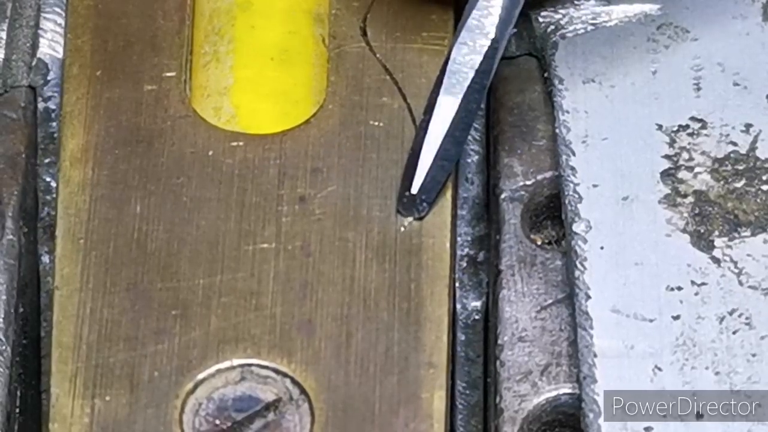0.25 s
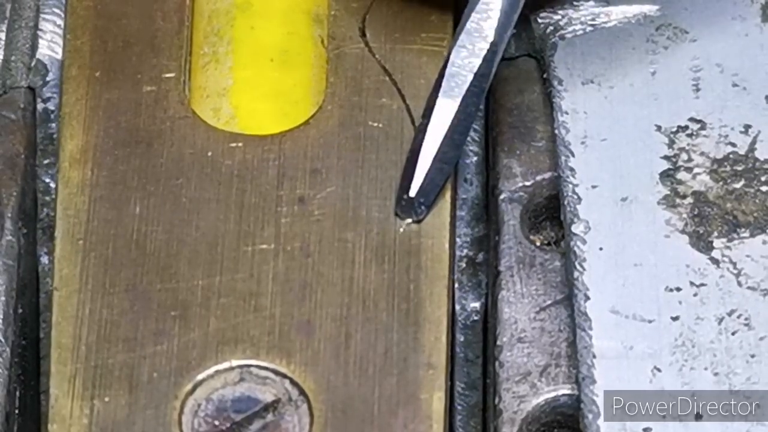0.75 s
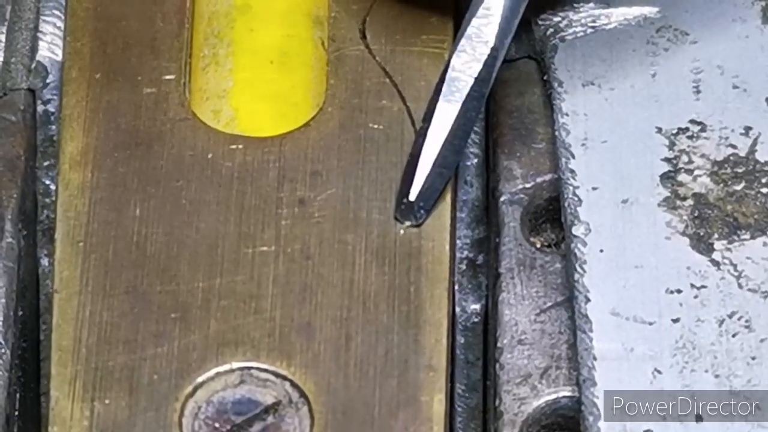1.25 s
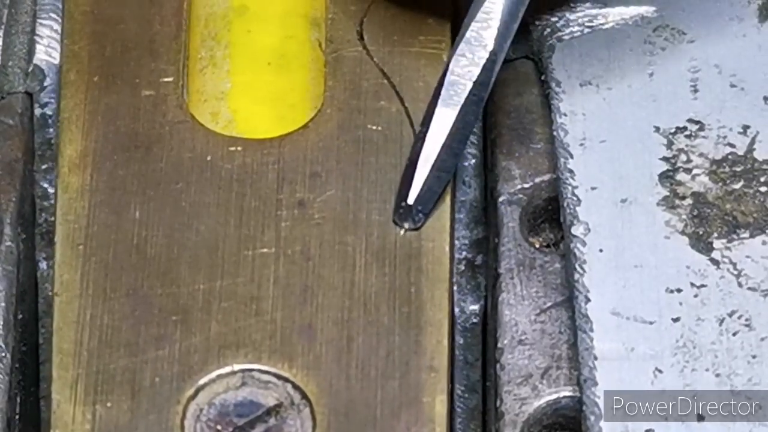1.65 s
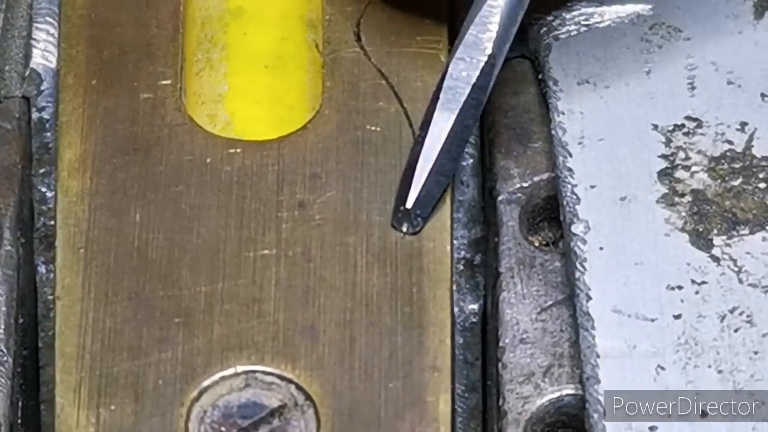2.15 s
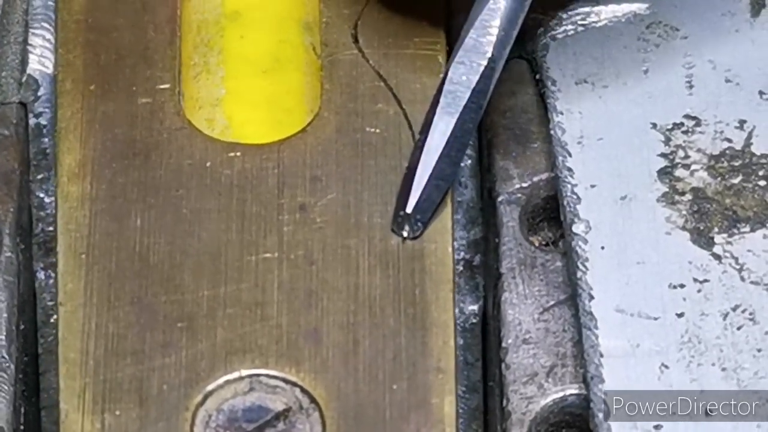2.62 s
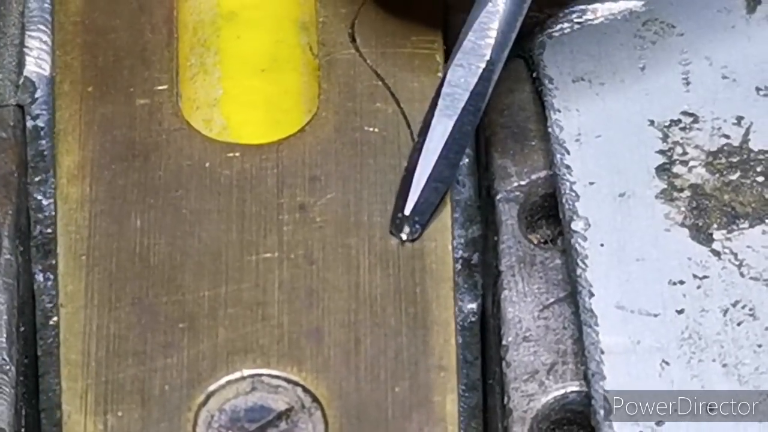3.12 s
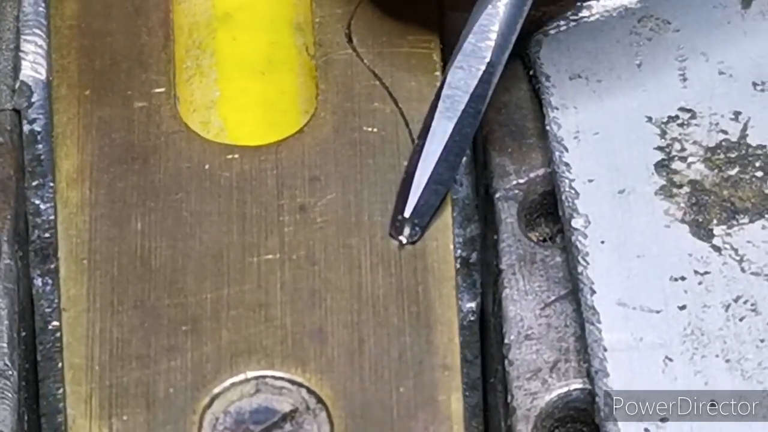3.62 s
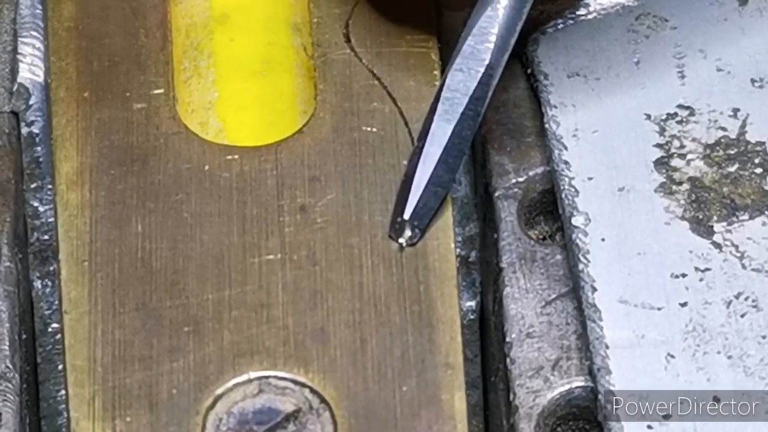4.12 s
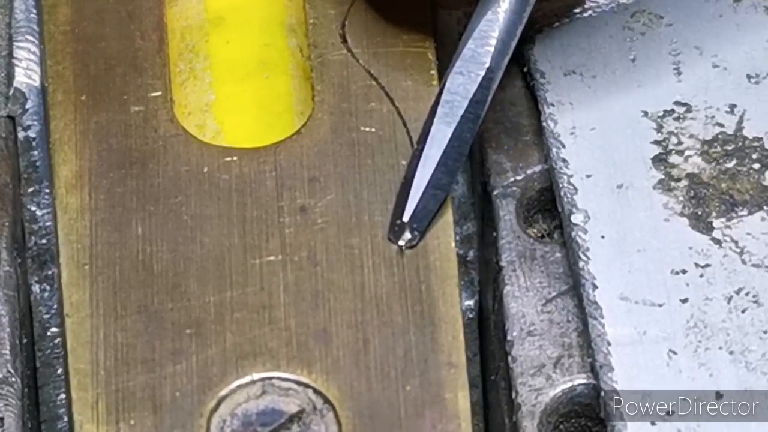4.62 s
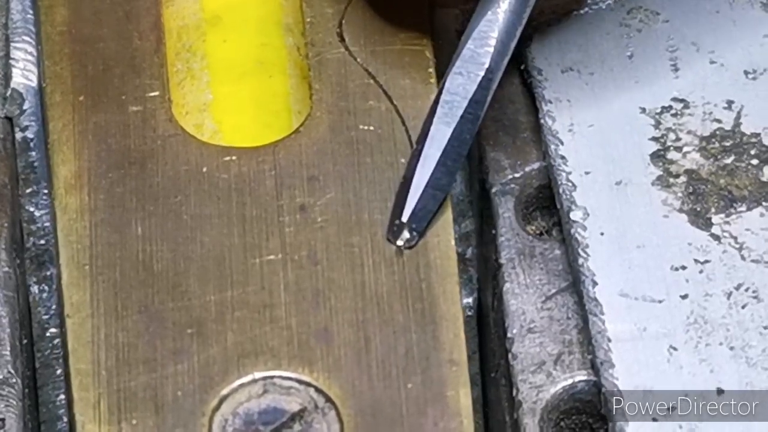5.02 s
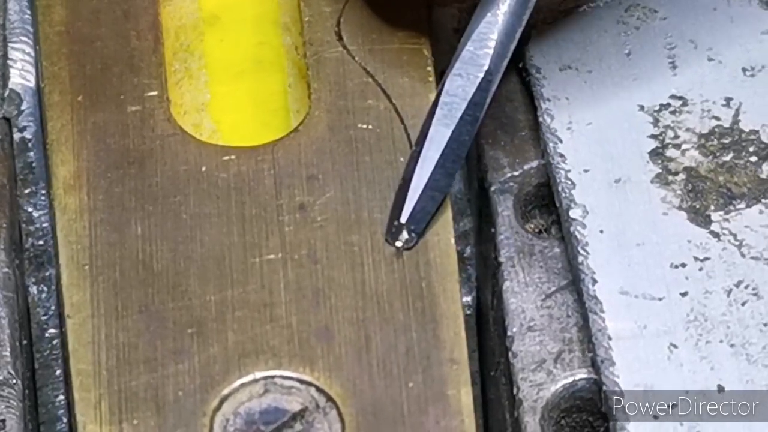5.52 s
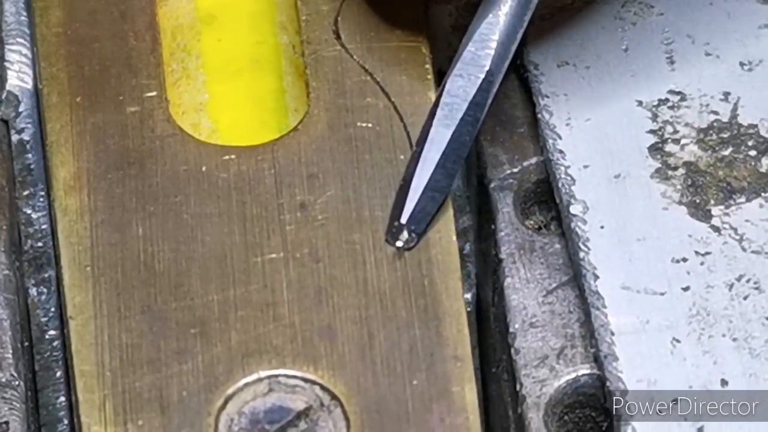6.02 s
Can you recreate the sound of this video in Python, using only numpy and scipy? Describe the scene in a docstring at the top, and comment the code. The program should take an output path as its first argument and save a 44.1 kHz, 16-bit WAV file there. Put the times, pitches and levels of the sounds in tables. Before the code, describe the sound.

For the first 0.2 seconds only a nearby pump is heard: a low throbbing hum with knocks and faint broad running noise, leaning slightly left. At about 0.22 s an engraving handpiece starts, its piston hammering a steel graver against brass about 25 times a second, in a dry, rapid, buzzing rattle. The first blows are thinner until the tip seats near 0.35 s. Each blow is a bright crack with a very short metallic ring from graver, plate and vice, followed by a hissing puff of air. From 0.7 to 1.4 s it is somewhat quieter, often to the right, then stronger around 1.7 s and softer near 2.5 s. From about 3 s the cut deepens, louder and harder, drifting centre to left, continuing to 6.27 s. Faint dull bench bumps fall near 0.5, 0.9, 2.1 and 5.6 s. Close stereo pickup, short small-room echoes, little extreme treble.

```python
"""A pump hums and knocks nearby; after about 0.22 s an engraving handpiece starts up, 25 blows a second.
Its piston hammers a steel graver along a brass plate held in a vice: each blow cracks a chip loose and
rings graver, plate and vice as decaying sines, with echoes from a small room. Shaped noise makes the air
that puffs out on the return stroke; now and then a hand bumps the bench with a dull, low ring."""
import sys
import numpy as np
from scipy import signal
from scipy.fft import rfft, irfft, next_fast_len
from scipy.io import wavfile
from scipy.ndimage import uniform_filter1d

SR = 44100
rng = np.random.default_rng(int(sys.argv[2]) if len(sys.argv) > 2 else 0)


def wav_out(sig):
    """Save sig, one row per channel (or a flat mono array), as 16-bit PCM at SR to the path in sys.argv[1]."""
    wavfile.write(sys.argv[1], SR, np.round(np.clip(np.atleast_2d(sig).T, -1, 1) * 32767).astype(np.int16))


def volts_from_db(level):
    """Convert decibel levels to linear amplitude ratios."""
    exponent = np.asarray(level, float) / 20
    return 10 ** exponent


N = 276507   # length [samples]

# The pump over time: (time [s], stroke hum [dB], overtones, knock and running noise [dB], left-right [dB])
PUMP_COURSE = [(0.0, -51, -61, 4.5), (0.23, -50.5, -57, 2.5), (0.488, -56, -58.5, -0.5),
               (0.71, -55, -61, -0.5), (1.38, -56, -61, -1.5), (1.55, -53, -61.5, -4), (1.83, -62, -60, -2),
               (2.09, -58, -60, -2), (2.43, -62, -63, -2.5), (3.28, -59.5, -62.5, 1), (3.56, -58, -62, 0),
               (4.24, -59, -60.5, 1.5), (4.66, -62, -62.5, 3.5), (5.17, -62, -62, 1.5),
               (5.55, -62, -61.5, 3), (6.27, -62, -61.5, 2.0)]
# Pump overtones: (multiple of the stroke rate, relative level [dB])
PUMP_OVERTONES = [(2, -15), (3, -21.5), (4, -18), (5, -14.5), (6, -17.5), (7, -14.5), (8, -9), (9, -29),
                  (11, -20), (12, -13.5), (15, -11), (16, -13.5), (17, -4), (18, -11), (20, -13.5),
                  (24, -30), (29, -18.5)]
# Resonances of the pump case: (frequency [Hz], relative level [dB], t60 [s])
PUMP_CASE_MODES = [(614, -14, 0.14), (743, -28, 0.25), (974, -8.5, 0.094), (1221, -4, 0.16),
                   (1472, -2.5, 0.052), (1880, -3.5, 0.014)]
# Colour of the broad running noise: (frequency [Hz], relative density [dB per Hz])
RUNNING_NOISE = [(60, -21), (120, -18.5), (200, -19.5), (300, -25), (425, -17.5), (668, -32), (735, -24.5),
                 (1300, -27), (2000, -30), (5080, -41.5), (7630, -34.5), (12000, -58)]
# Bumps on the bench: (time [s], relative level [dB], frequency [Hz])
BENCH_BUMPS = [(0.469, -53, 56.4), (0.56, -58, 57), (0.933, -48.5, 58.4), (1.492, -59, 56.5),
               (2.12, -57, 188), (2.179, -58, 87), (3.869, -64, 107), (4.501, -60, 130), (5.545, -50, 56.5),
               (5.589, -53, 156), (5.629, -52, 61.9)]
# How long the room's echoes last: (frequency [Hz], t60 [s])
ECHO_T60 = [(800, 0.5), (3000, 0.19), (8000, 0.13), (15000, 0.024)]
# How alike the echoes are on both sides: (frequency [Hz], left-right likeness [0-1])
ECHO_LIKENESS = [(800, 0.79), (2000, 1), (5000, 0.046), (12000, 0.054)]
# Colour of the exhaust air: (frequency [Hz], relative density [dB per Hz])
AIR_COLOUR = [(2000, -22.5), (4000, 0.5), (6500, -3), (8000, 5.5), (9000, -1), (11000, -20), (14500, -14),
              (16500, -30)]
# The hand guiding the graver, bite running from 0 shallow to 1 deep and a little beyond:
# (time [s], blow level [dB], bite, left-right balance of the blows [dB], how early the blow lands [ms])
HAND_COURSE = [(0.219, -29.5, -0.33, 3.5, 0.5), (0.321, -26.5, 0.37, 1, 1.5), (0.379, -25, -0.29, -1, 6),
               (0.437, -27.5, -0.45, -6, 6.5), (0.573, -26.5, -0.018, -5, 6), (0.632, -30, 0.13, -2, 4.5),
               (0.767, -30.5, 0.13, -0.5, 3.5), (0.893, -30, 0.5, -1.8, 6.5),
               (1.061, -28.5, 0.044, -2.5, 4), (1.179, -28.5, 0.14, -5.5, 9), (1.259, -32.5, 0.093, -1, 7),
               (1.352, -31, 0.29, -0.5, 4), (1.461, -27.5, 0.29, -5.5, 6.5), (1.58, -28, 0.37, -6, 5.5),
               (1.651, -25.5, 0.13, -6, 6), (1.771, -26, -0.073, -6, 8.5), (1.85, -28.5, 0.083, -3.5, 7.5),
               (2.199, -27.5, 0.38, -3.5, 8), (2.56, -29.5, 0.57, -3.5, 5.5), (2.97, -24, 0.86, -1, 7),
               (3.2, -25, 0.77, 0.8, 7.5), (3.65, -23, 1.05, -0.5, 8.5), (3.798, -21.5, 1.06, -0.5, 7.5),
               (3.99, -20.5, 0.96, 1, 7.5), (4.08, -22.5, 1.1, -1, 8), (4.3, -22.5, 1, 2, 8.5),
               (4.63, -23, 1.12, 3, 6), (4.901, -23.5, 0.93, 1.5, 6), (5.272, -22, 1.3, 3, 5),
               (5.4, -23, 1.05, -0.3, 2), (5.65, -23, 1.1, 4, 3.5), (5.87, -22, 1.2, 0.9, 1.67),
               (6.27, -21, 1.1, 0, 0.06)]
# Spread from blow to blow: (level [dB], bite, left-right [dB], timing [ms])
BLOW_SPREAD = [.7, .1, .6, .5]
# The vice ringing on: (frequency [Hz], relative level [dB], t60 [s])
VICE_RING = [(1001.6, -17.5, 0.21), (1127, -12, 0.074), (1270, -25, 0.051), (1670, -30, 0.039),
             (1955, -8, 0.13), (2302, -9, 0.096), (2640, -16, 0.047), (2796, -5.5, 0.045), (3063, -15, .06),
             (3520, -8.5, 0.066), (4145, -14, 0.067), (4430, -21, 0.056), (5560, -8, .05),
             (6220, -4.5, 0.049), (7620, -23, 0.03), (10000, -17, 0.036)]
# Dense short modes of the crack, shallow and deep cut: (frequency [Hz], relative density [dB per Hz])
SHALLOW_CRACK = [(600, -39), (1000, -30), (3000, -14.5), (6000, -5.5), (7600, -2), (9300, -9.5),
                 (10800, -22.5), (12000, -15.5), (14500, -16), (16000, -16)]
DEEP_CRACK = [(600, -69), (1000, -28), (3000, -14), (5500, -2.5), (7500, -11), (9500, -14), (11400, -26.5),
              (12500, -14.5), (13600, -33), (14500, -8.5), (16000, -39)]
# How alike the crack is on both sides: (frequency [Hz], left-right likeness [0-1])
CRACK_ALIKE = [(60, 0.96), (380, 0.69), (2380, 1), (15000, 0.044)]
# Graver, plate and vice, levels relative to one another: (frequency [Hz], t60 [s],
# level in a shallow cut [dB], level in a deep cut [dB], left-right [dB], lead of the left side [radians])
STRUCK_MODES = [(834.6, 0.019, -56, -41, 4.5, -0.2), (979, 0.033, -41.5, -35, 1.5, -0.18),
                (1130, 0.09, -66, -54, 6, 2.1), (1266, 0.043, -56, -44, 4, 0.6),
                (1738, 0.012, -35, -32.5, -0.5, 1.3), (1794, 0.023, -38.5, -50, 5.5, 0.8),
                (1926, 0.012, -35.5, -29, -1.5, 0.12), (2268, 0.045, -43, -35, -13.5, 1.56),
                (2384, 0.037, -35, -34, 2, 0.53), (2556, 0.0082, -26.5, -28, 4, 0.55),
                (2870, 0.046, -34.5, -29, 4, -0.2), (2992, 0.024, -39.5, -27.5, 8, -1.2),
                (3473, 0.026, -38, -25.5, 1, -0.3), (3750, 0.045, -42, -37, 16.5, 2.8),
                (3880, 0.019, -32, -27, 7, -1.75), (4234, 0.045, -40.5, -35.5, -8.5, -1.6),
                (4373, 0.056, -41.5, -38.5, 6, 0.2), (4870, 0.016, -31, -19.5, -1, -1.2),
                (5052, 0.025, -36, -27, 0, 0.1), (5277, 0.037, -44, -37.5, 13, 0.1),
                (5290, 0.024, -36.5, -35, 15.5, 3), (5646, 0.029, -31, -23.5, -0.5, 0.1),
                (5846, 0.016, -35, -35.5, 13, 3.5), (6575, 0.0095, -28.5, -23.5, 8, 0.93),
                (7044, 0.013, -33, -43, 5, 2.5), (7210, 0.025, -30.5, -28, 11, 4.5),
                (7420, 0.027, -28.5, -29, -9.5, 4.2), (7650, 0.02, -42, -27.5, -3.5, 2.4),
                (7810, 0.025, -29.5, -34.5, 15, 1.5), (8420, 0.02, -32, -31.5, -14, -1.4),
                (8720, 0.014, -35.5, -33, -14, 2)]
# The grip damps the shank's ring: (time [s], change in level [dB])
SHANK_DAMPING = [(.2, 8.5), (.5, 0), (1.08, 4), (1.15, -4.5), (2.5, -2.5), (6.27, -0.5)]
# The piston bounces on the graver: (time after the blow [s], level against the blow [dB])
PISTON_BOUNCES = [(.0047, -19), (.0074, -24)]

FIRST_BLOW_S, STROKE_S, IDLE_STROKE_S = .2196, .039788, .0396   # the idle stroke runs before the first blow
RETURN_SHALLOW_S, RETURN_DEEP_S = 0.016, 0.017   # the piston ticks at the end of its return stroke
SEATED_S = 0.352   # time at which the tip has seated
UNSEATED_HZ, UNSEATED_DB = 5060, -19.5   # until then, modes under this pitch lose dB per octave
UNSEATED_CRACK_DB = -11   # and little chip breaks yet
BENCH_HZ, BENCH_DB, BENCH_T60_S = 163.6, -7, 0.28   # bench top, its level against the bump
SHANK_HZ = 5630


def rms_one(x):
    """Scale to rms 1."""
    return x / np.sqrt(np.mean(x ** 2) + 1e-20)


def at_hz(points, hz):
    """Read a table on a log-frequency axis."""
    table_hz, values = np.transpose(points)
    return np.interp(np.log(np.maximum(hz, 1)), np.log(table_hz), values)


def sides(pan_db):
    """Left and right gains; positive leans left."""
    return volts_from_db(np.array([pan_db / 2, -pan_db / 2]))


def coloured(spectrum, size, likeness):
    """Stereo noise with a given spectrum and left-right likeness, at rms 1."""
    hz = np.arange(size // 2 + 1) * SR / size
    mid, side = rfft(rng.standard_normal((2, size))) * volts_from_db(at_hz(spectrum, hz))
    alike = np.clip(at_hz(likeness, hz), 0, 1)
    stereo = np.sqrt(1 + alike) * mid + np.sqrt(1 - alike) * side * [[1], [-1]]
    return rms_one(irfft(stereo, size))


def clicks(seconds, sizes):
    """One click for each time; sizes may be a row per channel."""
    out = np.zeros(np.shape(sizes)[:-1] + (N,))
    out[..., np.round(np.asarray(seconds) * SR).astype(int)] = sizes
    return out


def ring(x, hz, t60):
    """A unit click sets a decaying arrow of length 1 turning; its shadow is the sine."""
    turn = volts_from_db(-60 / (t60 * SR)) * np.exp(2j * np.pi * hz / SR)
    return signal.lfilter([1], [1, -turn], x + 1e-18)


def related(rows, likeness):
    """Blend into each row a share of the one before it; the spread stays the same."""
    alike = np.clip(likeness, 0, .98)
    fresh = np.sqrt(1 - alike ** 2)
    return signal.lfilter([fresh], [1, -alike], rows, axis=0, zi=alike * rows[-1:])[0]


def looseness(s):
    """How loosely the tip sits: 1 at the first blow, 0 once seated."""
    return np.clip((SEATED_S - s) / (SEATED_S - s[0]), 0, 1)


def strokes(s):
    """Pump cycles counted so that every blow falls on a whole number."""
    t = np.arange(N) / SR
    idle = (t - s[0]) / IDLE_STROKE_S
    return np.where(t < s[0], idle, np.interp(t, s, np.arange(len(s))))


def pump(cycles, overtone_db, knock_db, floor_db, knock_lead):
    """A hum on the stroke rate and its multiples, a knock in the case every turn, and broad running noise."""
    s, *columns = np.transpose(PUMP_COURSE)
    hum_db, body_db, pan_db = [np.interp(np.arange(N) / SR, s, c) for c in columns]
    # the crank turns more evenly than the blows fall
    flywheel = uniform_filter1d(np.gradient(cycles), size=32768)
    flywheel = uniform_filter1d(flywheel, size=16384)
    turn = 2 * np.pi * (cycles[0] + np.cumsum(flywheel))
    hum = np.sqrt(2) * volts_from_db(hum_db) * np.cos(turn - 2.8)
    starts = rng.uniform(0, 2 * np.pi, len(PUMP_OVERTONES))   # each multiple starts at its own angle
    overtones = sum(volts_from_db(db) * np.sin(k * turn + a) for (k, db), a in zip(PUMP_OVERTONES, starts))
    knocks = np.diff(np.floor(cycles + knock_lead), prepend=0) == 1
    knock = 0
    for hz, db, t60 in PUMP_CASE_MODES:
        struck = knocks * volts_from_db(rng.normal(0, 1.3, N))
        knock = knock + volts_from_db(db) * ring(struck, hz, t60).imag
    floor = coloured(RUNNING_NOISE, next_fast_len(N), [(60, 0.82), (600, 0.97), (8000, 0.13)])[:, :N]
    body = volts_from_db(overtone_db) * rms_one(overtones) + volts_from_db(knock_db) * knock + volts_from_db(floor_db) * floor
    return (hum + volts_from_db(body_db) * body) * sides(pan_db)


def bumps(cycles, level_db):
    """Dull thuds: a low push that rings a few cycles and sets the bench top going."""
    soft = signal.butter(2, 400, fs=SR, output="sos")
    push = 0
    for s, db, hz in BENCH_BUMPS:
        push = push + ring(clicks([s], [volts_from_db(db + level_db)]), hz, cycles / hz).imag
    s, db, _ = np.transpose(BENCH_BUMPS)
    top = ring(clicks(s, volts_from_db(db + level_db + BENCH_DB)), BENCH_HZ, BENCH_T60_S).imag
    return signal.sosfilt(soft, push + top)


def room(x, blows, first_s, count):
    """Dense echoes, each band dying at its own rate."""
    t = np.arange(12288) / SR
    edges = 500 * 2.0 ** np.arange(6)   # octave bands [Hz]
    # several random echo patterns slowly crossfade, so no single one colours the whole
    place = np.linspace(0, count - 1, N)
    mono = np.mean(x, axis=0, keepdims=True)
    out = 0
    for k in range(count):
        noise = coloured([(500, 0), (16000, 0)], len(t), ECHO_LIKENESS)
        echo = 0
        for low, high in zip(edges, edges[1:]):
            octave = signal.butter(2, [low, high], "band", fs=SR, output="sos")
            decay = volts_from_db(-60 * t / at_hz(ECHO_T60, np.sqrt(low * high)))
            echo = echo + signal.sosfilt(octave, noise) * decay
        echo = echo * (1 - np.exp(-(t / first_s) ** 2))
        echo = echo / np.sqrt(np.sum(echo ** 2) / 2)
        heard = mono * np.sqrt(np.clip(1 - np.abs(place - k), 0, 1))
        out = out + signal.oaconvolve(heard, echo, axes=1)[:, :N]
    return out * sides(np.interp(np.arange(N) / SR, *blows[[0, 3]]))


def puff(blows, level_db, follows, centre, width, leak_db, tick_db, tick_t60, grain_db):
    """Air sputters out of the handpiece, most on the return stroke, and spits as the piston ticks back."""
    s, db, bite, pan_db = blows
    t = np.arange(N) / SR
    back = s + np.interp(bite, [0, 1], [RETURN_SHALLOW_S, RETURN_DEEP_S])
    back = np.minimum(back, (N - 1) / SR)
    # at 0 Hz the ring is a bare decay: the spit's envelope
    tick = np.abs(ring(clicks(back, volts_from_db(tick_db + rng.normal(0, 6.0, len(s)))), 0, tick_t60))
    exhaust = np.exp(-((strokes(s) % 1 - centre) / width) ** 2)
    gate = volts_from_db(leak_db) + exhaust + tick
    sputter = volts_from_db(grain_db * rms_one(uniform_filter1d(rng.standard_normal(N), size=48)))
    start = np.clip((t - s[0]) / 0.0073, 0, 1)   # silent before the first blow
    effort = volts_from_db(follows * np.interp(t, s, db) + level_db) * start
    hiss = coloured(AIR_COLOUR, next_fast_len(N), [(2000, 0.39), (15000, 0.059)])[:, :N]
    return hiss * gate * sputter * effort * sides(np.interp(t, s, pan_db))


def piston():
    """One blow per pump stroke, as the hand sets it, with a little chance: rows s, dB, bite, left-right dB."""
    due = np.arange(FIRST_BLOW_S, N / SR, STROKE_S)
    s, *columns = np.transpose(HAND_COURSE)
    chance = rng.standard_normal((len(due), len(columns))) * BLOW_SPREAD
    guided = np.array([np.interp(due, s, c) for c in columns])
    db, bite, pan_db, early_ms = guided + chance.T
    return np.array([np.minimum(due - early_ms / 1000, (N - 1) / SR), db, bite, pan_db])


def vice(blows, level_db, deep_db, scatter_db, spread, rise_t60):
    """The vice takes each blow softly and rings on, more in a deep cut; its modes reach each side differently."""
    s, db, bite, pan_db = blows
    seated = np.clip((s - s[0]) / (SEATED_S - s[0]), .1, 1)
    chance = rng.standard_normal((len(s), len(VICE_RING)))
    leads = rng.standard_normal(len(VICE_RING))
    out = np.zeros((2, N))
    for k, (hz, mode_db, t60) in enumerate(VICE_RING):
        blow_db = db + level_db + deep_db * bite + mode_db + scatter_db * chance[:, k]
        struck = clicks(s, seated * volts_from_db(blow_db) * sides(pan_db))
        arrow = ring(struck, hz, t60) - ring(struck, hz, rise_t60)   # soft onset
        turn = np.exp(.5j * spread * leads[k] * np.array([[1], [-1]]))
        out += (arrow * turn).imag
    return out


def crack(blows, level_db, t60, rise_s, scatter_db, likeness):
    """A dense burst as the chip breaks; its grain is mostly fresh at each blow."""
    s, db, bite, pan_db = blows
    deep = np.clip(bite, 0, 1)
    t = np.arange(2048) / SR
    shape = volts_from_db(-60 * t / t60) * (1 - np.exp(-t / rise_s))
    chance_db = scatter_db * rng.standard_normal(len(s))
    size = volts_from_db(db + level_db + UNSEATED_CRACK_DB * looseness(s) + chance_db) * sides(pan_db)
    bursts = 0
    for spectrum, share in ((SHALLOW_CRACK, np.sqrt(1 - deep)), (DEEP_CRACK, np.sqrt(deep))):
        noise = np.array([coloured(spectrum, len(t), CRACK_ALIKE) for _ in s])
        bursts = bursts + related(noise, likeness) * share[:, None, None]
    out = np.zeros((2, N + len(t)))
    for start, gains, burst in zip(np.round(s * SR).astype(int), size.T, bursts):
        out[:, start:start + len(t)] += gains[:, None] * burst * shape
    return out[:, :N]


def ringing(blows, level_db, scatter_db, rise_t60):
    """Each blow strikes every mode; a deeper bite shifts the strength from tip to plate."""
    s, db, bite, pan_db = blows
    hz, t60, shallow_db, deep_db, mode_pan_db, lead = np.transpose(STRUCK_MODES)
    octaves_under = np.maximum(np.log2(UNSEATED_HZ / hz), 0)
    unseated_db = UNSEATED_DB * np.outer(looseness(s), octaves_under)
    share = volts_from_db(shallow_db + np.outer(bite, deep_db - shallow_db) + unseated_db)
    shank = np.argmin(np.abs(hz - SHANK_HZ))
    share[:, shank] *= volts_from_db(np.interp(s, *np.transpose(SHANK_DAMPING)))
    share = share / np.sqrt(np.sum(share ** 2, axis=1, keepdims=True))
    chance_db = scatter_db * related(rng.standard_normal(share.shape), 0.3)
    size = share * volts_from_db(db[:, None] + level_db + chance_db)
    out = np.zeros((2, N))
    for k in range(len(hz)):
        struck = clicks(s, size[:, k] * sides(pan_db))
        arrow = ring(struck, hz[k], t60[k]) - ring(struck, hz[k], rise_t60)   # the ring swells in briefly
        turn = np.exp(.5j * lead[k] * np.array([[1], [-1]]))
        # neighbours swing opposite ways
        out += (-1) ** k * sides(mode_pan_db[k])[:, None] * (arrow * turn).imag
    after_s, bounce_db = np.transpose(PISTON_BOUNCES)
    bounce = clicks([0, *after_s], volts_from_db([0, *bounce_db]))   # the blow itself, then its bounces
    return signal.oaconvolve(out, bounce[None, :1024], axes=1)[:, :N]


def scene():
    """Pump, bench bumps, air and work together; the work alone sounds the room."""
    blows = piston()
    drive = pump(strokes(blows[0]), overtone_db=-2.5, knock_db=4.0, floor_db=-2.0, knock_lead=0.32)
    thuds = bumps(cycles=7.8, level_db=2.0)
    air = puff(blows, level_db=-34.0, follows=0.65, centre=0.42, width=0.31, leak_db=-16.0,
               tick_db=-2.5, tick_t60=0.0084, grain_db=3.0)
    work = vice(blows, level_db=-19.0, deep_db=3.5, scatter_db=1.0, spread=0.19, rise_t60=0.0033)
    work = work + crack(blows, level_db=-9.5, t60=0.038, rise_s=0.0001, scatter_db=1.0, likeness=0.21)
    # the piston's first contact
    work = work + crack(blows, level_db=-1.5, t60=0.0077, rise_s=0.00005, scatter_db=0.1, likeness=0.33)
    work = work + ringing(blows, level_db=6.0, scatter_db=0.62, rise_t60=0.00062)
    echoes = volts_from_db(-11.0) * room(work, blows, first_s=0.0031, count=12)
    return work + echoes + air + drive + thuds


def roll_off(x):
    """The treble ends steeply here."""
    return signal.sosfilt(signal.butter(12, 16490, fs=SR, output="sos"), x)


def record(dry):
    """The sound fades out above about 15 kHz."""
    top = signal.butter(8, 15200, fs=SR, output="sos")
    mix = signal.sosfilt(top, dry)
    return roll_off(mix)


dry = scene()
out = record(dry)
wav_out(out)
```